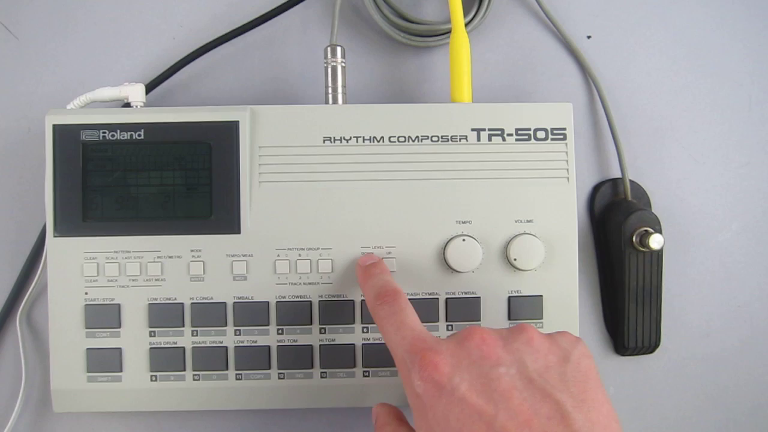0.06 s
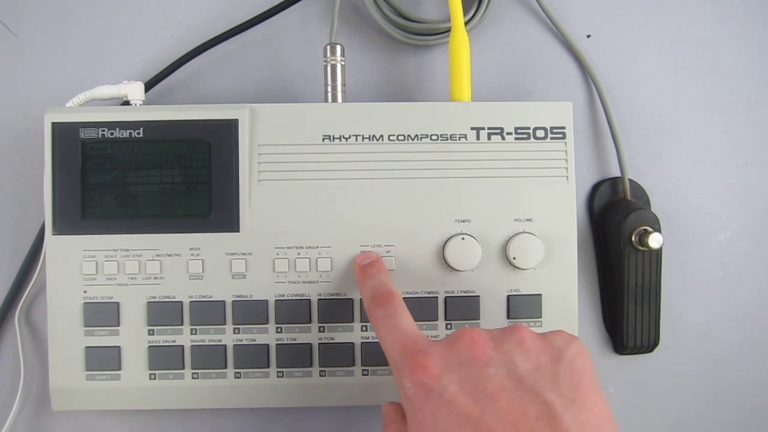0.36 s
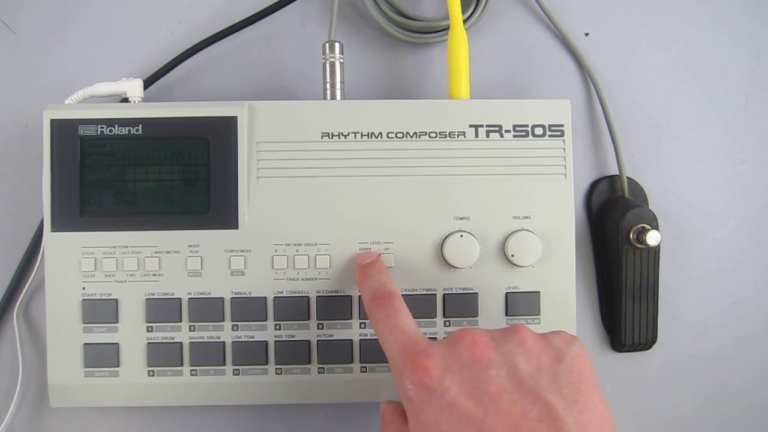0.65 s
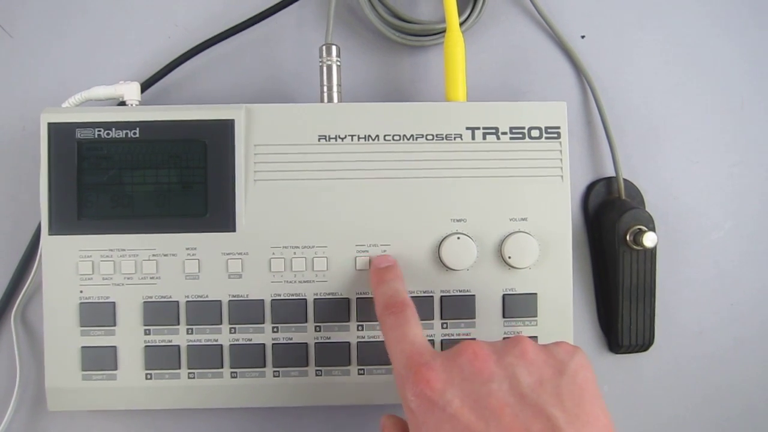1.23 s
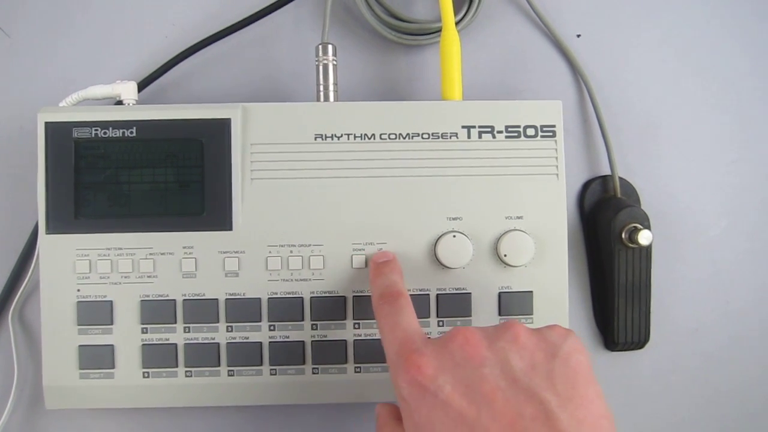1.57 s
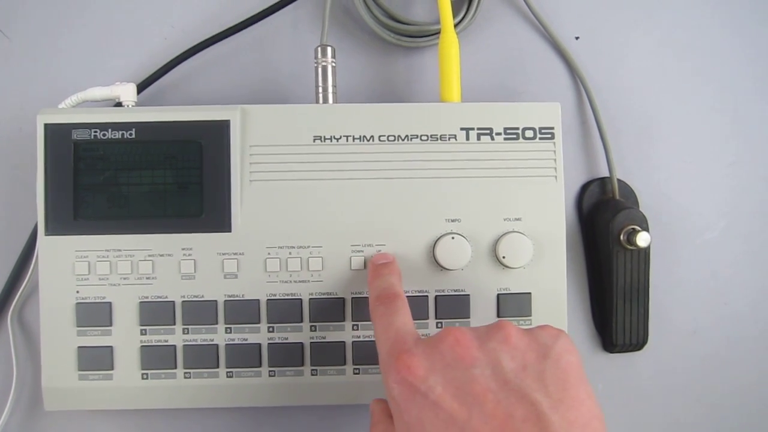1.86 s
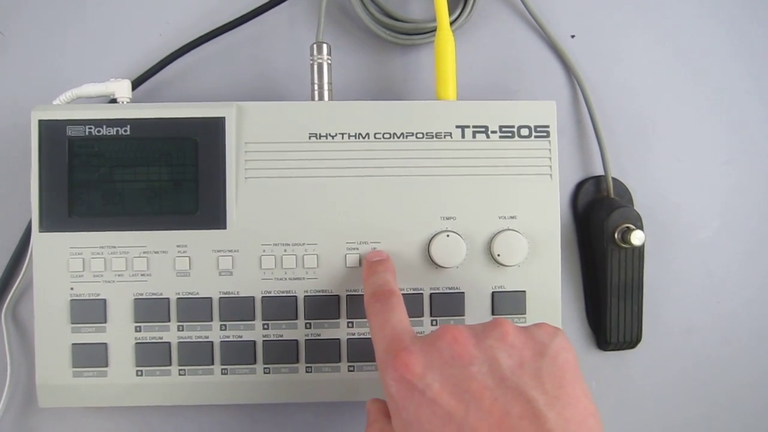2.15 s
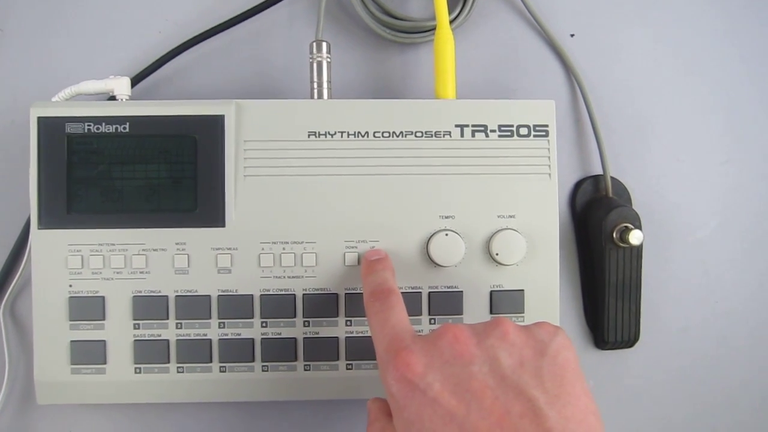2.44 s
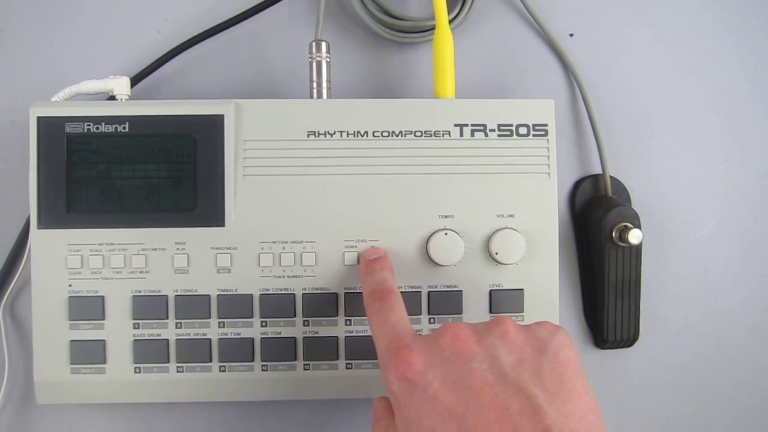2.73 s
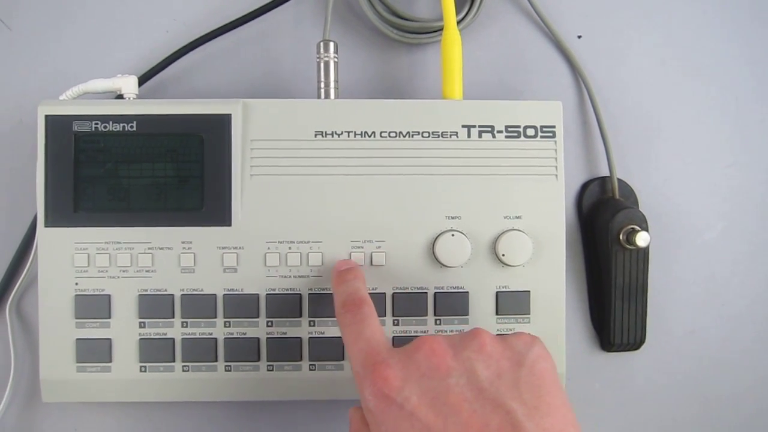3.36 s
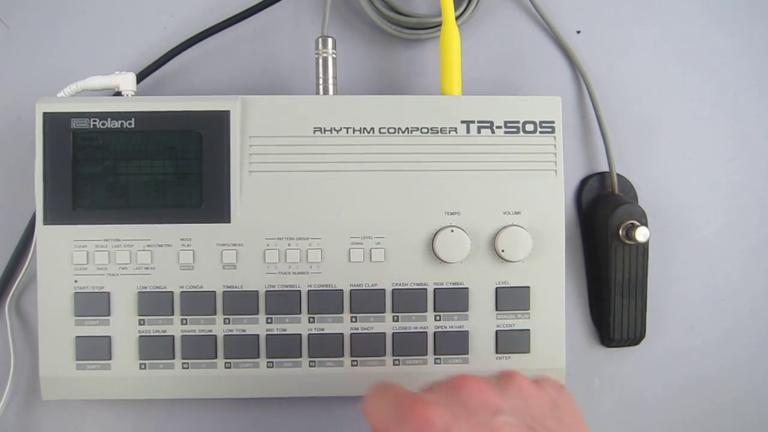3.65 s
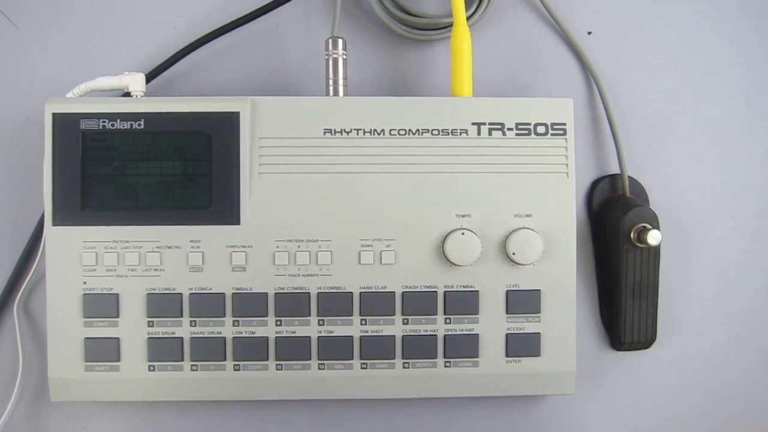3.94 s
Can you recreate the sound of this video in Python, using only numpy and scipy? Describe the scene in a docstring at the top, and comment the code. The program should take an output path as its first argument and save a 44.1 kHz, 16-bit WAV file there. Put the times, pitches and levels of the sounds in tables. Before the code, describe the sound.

Small plastic buttons clicking under a finger, with light hollow knocks over quiet room hiss.

```python
"""A quiet room runs throughout: a machine's low hum, rumble, and the recorder's hiss with a thin whine.
A finger works two small buttons on a plastic-cased device lying on a table. The caps tick as they
are touched or spring back, and a button bottoming out knocks the hollow case.
A run of presses fills the first two seconds; after a pause, two more knocks and a last pair of ticks.
The room is left alone for the final second, and the hiss rises slightly."""
import sys
import numpy as np
from scipy import signal
from scipy.fft import rfft, irfft
from scipy.io import wavfile

SR = 44100
rng = np.random.default_rng(int(sys.argv[2]) if len(sys.argv) > 2 else 0)


def master(y):
    """Save y as 16-bit WAV."""
    cut = np.clip(np.atleast_2d(y).T, -1, 1)
    pcm = np.round(cut * 32767)  # scale
    wavfile.write(sys.argv[1], SR, pcm.astype(np.int16))


N = 176400
T = np.arange(N) / SR
ROOM_T60_S = 0.21
MODE_SPREAD = 0.071   # share of each mode that differs left to right


def from_db(db):
    """Decibels to gain."""
    return 10 ** (np.asarray(db) / 20)


def rms_one(x):
    """Scale to rms 1."""
    return x / np.sqrt(np.mean(x ** 2) + 1e-20)


def in_time(rows):
    """A breakpoint curve at every sample."""
    return np.interp(T, *np.transpose(rows))


def at_hz(points, hz):
    """Read a curve on a log-frequency axis."""
    points_hz, values = np.transpose(points)
    return np.interp(np.log(hz + 1e-3), np.log(points_hz), values)


def pan(db):
    """Left and right gains, the left louder by db."""
    return from_db(np.array([[db], [-db]]) / 2)


def drift(rate_hz):
    """Slow random motion of spread about 1."""
    knots = rng.standard_normal(256)
    return np.interp(T * rate_hz, np.arange(len(knots)), knots)


def noise(spectrum, likeness, size=N):
    """Stereo noise with a given colour and left-right likeness; rms 1."""
    hz = np.fft.rfftfreq(size, 1 / SR)
    mid, side = rfft(rng.standard_normal((2, size)))
    alike = likeness if np.isscalar(likeness) else at_hz(likeness, hz)
    stereo = np.sqrt(1 + alike) * mid + np.sqrt(1 - alike) * side * [[1], [-1]]
    return rms_one(irfft(from_db(at_hz(spectrum, hz)) * stereo, size))


def tone(hz):
    """A sine of rms 1 that follows a pitch curve."""
    return np.sqrt(2) * np.sin(2 * np.pi * (np.cumsum(hz) / SR + rng.random()))


def band(x, low_hz, high_hz):
    """Low and high cuts."""
    for hz, kind in (low_hz, "high"), (high_hz, "low"):
        x = signal.sosfilt(signal.butter(3, hz, kind, fs=SR, output="sos"), x)
    return x


def add(out, start_s, sound):
    """Mix a sound in at a time."""
    i = int(start_s * SR)
    out[:, i:i + sound.shape[-1]] += sound[..., :N - i]


# Balance of the shaft's first three harmonics: level_db
SHAFT_HARMONICS = [-49.5, -41, -55.5]
# Fader ride on the shaft, taken relative to its average: time_s, level_db
SHAFT_RIDE = [(0.0, -31), (0.04, -30), (1.05, -36.5), (1.54, -32.5), (1.77, -42), (1.85, -33.5),
              (2.48, -35), (2.95, -43.5), (2.97, -57), (3.13, -36), (3.83, -39.5), (4.0, -45)]
# Fader ride on the drone, before its trim: time_s, level_db
DRONE_RIDE = [(0.0, -39), (0.11, -35), (0.8, -41), (0.83, -37), (1.61, -51.5), (1.64, -40), (1.75, -50),
              (2.15, -37.5), (2.57, -40.5), (2.63, -34), (3.12, -57), (3.16, -43.5), (3.79, -47.5),
              (4.0, -41.5)]
# Fader ride on the drone's octave: time_s, level_db
OCTAVE_RIDE = [(0, -61.5), (2.95, -61.5), (3.12, -50.5), (3.35, -52.5), (3.55, -63), (4, -73)]
# Faint tones above the hum: pitch_hz, level_db, wander_hz
FAINT_TONES = [(462.8, -60.5, 1.47), (586.3, -70, 3.3), (2665, -85, 3.6)]

def machine_hum(shaft_hz=28.05, drone_hz=127.03, drone_wander_hz=1.258, drone_trim_db=0.5):
    """A turning shaft's harmonics, a wavering drone with its octave, and faint higher tones."""
    ride_db = in_time(SHAFT_RIDE)
    speed_hz = shaft_hz * (1 + 0.004 * drift(3.9))
    shaft = sum(from_db(db) * tone(k * speed_hz) for k, db in enumerate(SHAFT_HARMONICS, 1))
    shaft *= from_db(ride_db - ride_db.mean())
    pitch_hz = drone_hz + drone_wander_hz * drift(3.09)
    drone = from_db(in_time(DRONE_RIDE) + drone_trim_db) * tone(pitch_hz)
    octave = from_db(in_time(OCTAVE_RIDE)) * tone(2 * pitch_hz)
    faint = sum(from_db(db) * tone(hz + wander_hz * drift(20)) for hz, db, wander_hz in FAINT_TONES)
    return shaft + drone + octave + faint


# Stereo image of rumble and hiss, narrow lows and wide highs: frequency_hz, left_right_likeness
BED_IMAGE = [(30, 0.53), (130, 0.9), (250, 0.47), (500, 0.58), (1000, 0.31), (2500, 0.073), (6000, 0.055),
             (14000, 0.081)]
# EQ curve of the rumble: frequency_hz, relative_db
RUMBLE_EQ = [(20, -9), (30, -18), (39, 5), (50, 2), (70, -3), (95, 0.5), (150, -0.5), (200, -8.5),
             (280, -10.5), (430, -13.5), (600, -12.5), (750, -18.5), (1200, -23), (1600, -32),
             (4000, -48.5)]
# Fader ride on the rumble: time_s, level_db
RUMBLE_RIDE = [(0, -44), (1, -44.5), (2, -43.5), (3, -45), (4, -44.5)]

def room_rumble():
    """A dark, almost steady bed of room noise."""
    return from_db(in_time(RUMBLE_RIDE)) * noise(RUMBLE_EQ, BED_IMAGE)


# The whine's five partials, low to high and one flutter rate apart: relative_db
WHINE_PARTIALS = [-29, -10, 4, -15, -14]

def electronic_whine(centre_hz=8799, flutter_hz=24, base_db=-74):
    """Close partials beat into a steady flutter, nearly opposed in the two channels."""
    left_lead_rad = np.array([[2.5], [0]])
    whine = np.zeros((2, N))
    for k, db in enumerate(WHINE_PARTIALS, -2):
        phase = 2 * np.pi * ((centre_hz + k * flutter_hz) * T + rng.random())
        whine += from_db(base_db + db) * np.sqrt(2) * np.sin(phase + left_lead_rad)
    return whine


def electronic_whistles(pitches_hz=(9923, 15734), levels_db=(-85, -87), wanders_hz=(20, 1)):
    """Two thinner whistles from the electronics, each wavering in pitch."""
    return sum(from_db(db) * tone(hz + wander_hz * drift(28))
               for hz, db, wander_hz in zip(pitches_hz, levels_db, wanders_hz))


# EQ curve of the hiss: frequency_hz, relative_db
HISS_EQ = [(300, -1), (1500, 3.5), (2700, 1), (4500, -2.5), (6500, -7.5), (7700, -16), (9000, -15),
           (10300, -10), (12500, -11.5), (15500, -18)]
# Fader ride that lifts the hiss at the end: time_s, boost_db
HISS_RIDE = [(0, 0.5), (3.2, 0.5), (3.7, 0.6), (4, 2.6)]

def electronic_hiss(base_db=-57):
    """The electronics' wide noise floor, leaning right."""
    return from_db(base_db + in_time(HISS_RIDE)) * noise(HISS_EQ, BED_IMAGE) * pan(-1.6)


def plastic_crack(spectrum, t60_s, room_db, likeness, size=8192):
    """Dense, quickly dying plastic modes, played as a noise burst with the room's faint tail."""
    t = T[:size]
    direct = noise(spectrum, likeness, size) * from_db(-60 * t / t60_s)
    tail = noise(spectrum, 0, size) * from_db(room_db - 60 * t / ROOM_T60_S)
    return direct + tail


# EQ curve of a cap's contact: frequency_hz, relative_db
CAP_EQ = [(500, -20), (1100, 0), (1550, 0), (2200, 2), (3000, 0.5), (4700, -7.5), (6500, -9.5),
          (10000, -28.5), (12000, -13), (15500, -39)]
# Modes that ring on after a tick: pitch_hz, relative_db, t60_s
CAP_RING = [(1480, -8.5, 0.07), (1987, -9.5, .07), (2143, -9, 0.095), (2418, -12, 0.095), (2750, -7, 0.029),
            (3280, -15.5, 0.039), (3685, -18, 0.12), (4587, -11, 0.036)]
# Cue list of cap ticks, before their trim: start_s, level_db, low_cut_hz, high_cut_hz, rattle_length_s
TICK_CUES = [(0.028, -42.5, 1300, 4000, .004), (0.2172, -39, 1000, 9000, 0.0035),
             (0.76, -36, 1500, 12900, 0.0026), (1.013, -41, 2500, 5200, 0.0017),
             (1.060, -46, 1200, 6030, .002), (1.0862, -37.5, 3000, 5570, .004),
             (1.181, -32, 2370, 5400, 0.0092), (1.3615, -38.5, 2300, 4200, 0.0029),
             (1.501, -31, 1400, 12000, .0035), (1.789, -38, 2600, 5440, 0.0046),
             (3.004, -39, 2900, 3800, .005), (3.0266, -39.5, 2700, 7500, 0.0022)]

def cap_ticks(trim_db=-6, rattle_db=-7, bounces=3, size=8192):
    """A cap strikes its guide, rings briefly and rattles lightly; each tick has its own band."""
    out, t = np.zeros((2, N)), T[:size]
    hz, mode_db, t60_s = np.transpose(CAP_RING)[:, :, None]
    modes = np.sin(2 * np.pi * hz * t) * from_db(mode_db - 60 * t / t60_s)
    contact = dict(spectrum=CAP_EQ, t60_s=0.03, room_db=-19, likeness=0.43)
    for start_s, level_db, low_hz, high_hz, rattle_s in TICK_CUES:
        polarity = rng.choice([-1, 1], len(hz))
        ring = (polarity + MODE_SPREAD * rng.standard_normal((2, len(hz)))) @ modes
        gain = from_db(level_db + trim_db)
        add(out, start_s, gain * band(ring + plastic_crack(**contact), low_hz, high_hz))
        for k in range(bounces):
            bounce = band(plastic_crack(**contact), low_hz, high_hz)
            delay_s = rattle_s * (k + rng.uniform(.5, 1)) / bounces
            add(out, start_s + delay_s, gain * from_db(rattle_db) * bounce)
    return out


# Modes of the hollow case: pitch_hz, relative_db, t60_s
CASE_RING = [(80.5, -5, 0.4), (219, -9.5, 0.1), (310, -13, 0.017), (362.6, -3.5, 0.068), (409, 6.5, 0.031),
             (451, -0.5, 0.06), (556, -45.5, 0.11), (857, -19, 0.086), (1034, -13, 0.042),
             (1205, -10.5, 0.031), (1300, -9.5, 0.01), (1973, -25, 0.039)]
# EQ curve of the hard contact snap: frequency_hz, relative_db
SNAP_EQ = [(300, -3), (1200, 4), (2000, 0), (4000, -4), (7000, -16), (11000, -18), (15000, -38)]
# Cue list of buttons bottoming out: start_s, ring_gain_db, brightness_db_per_octave, snap_gain_db
KNOCK_CUES = [(0.2264, -21, 1, -37), (0.7733, -20, -1, -37.5), (1.0884, -33.5, 2.5, -51),
              (1.3767, -25.5, -0.5, -51), (1.502, -36, -5, -55), (1.6466, -27.5, -5, -44),
              (1.791, -38, 0, -56), (2.73, -24, 0.2, -48), (2.929, -36.5, 1, -55)]

def case_knocks(build_up_cycles=1.59, scatter_db=0.5, room_db=-16, snap_trim_db=0.5, size=16384):
    """A button snaps against its stop and sets the case swinging; the room answers."""
    out, t = np.zeros((2, N)), T[:size]
    hz, mode_db, t60_s = np.transpose(CASE_RING)[:, :, None]
    build_up = 1 - np.exp(-t * hz / build_up_cycles)
    modes = np.sin(2 * np.pi * hz * t) * build_up * from_db(mode_db - 60 * t / t60_s)
    # Brightness tilts only the modes above the strongest one.
    octaves_up = np.maximum(np.log2(hz[:, 0] / hz[np.argmax(mode_db)]), 0)
    for start_s, ring_db, brightness, snap_db in KNOCK_CUES:
        strength = from_db(brightness * octaves_up + scatter_db * rng.standard_normal(len(hz)))
        sides = 1 + MODE_SPREAD * rng.standard_normal(len(hz)) * [[1], [-1]]
        ring = from_db(ring_db) * (strength * sides) @ modes
        room = rms_one(rng.standard_normal((2, size)) * from_db(-60 * t / ROOM_T60_S)) / np.sqrt(size)
        reverb = signal.fftconvolve(ring, room, axes=1)[:, :size]
        add(out, start_s, ring + from_db(room_db) * reverb)
        snap = plastic_crack(SNAP_EQ, t60_s=0.0024, room_db=-13, likeness=0.91)
        add(out, start_s, from_db(snap_db + snap_trim_db) * snap)
    return out


def scene():
    """Buttons just left of centre, over the room and the electronics' noise."""
    room = (machine_hum() + room_rumble()) * pan(-0.78)
    buttons = (case_knocks() + cap_ticks()) * pan(1)
    return room + buttons + electronic_whine() + electronic_whistles() + electronic_hiss()


def record(dry, notch_hz=(7880, 8640), cutoff_hz=15800):
    """The recorder has a narrow notch in the treble and a steep top cut."""
    notch = signal.butter(5, notch_hz, "bandstop", fs=SR, output="sos")
    top_cut = signal.ellip(12, .1, 90, cutoff_hz, fs=SR, output="sos")
    return signal.sosfilt(top_cut, signal.sosfilt(notch, dry))


dry = scene()
out = record(dry)
master(out)
```